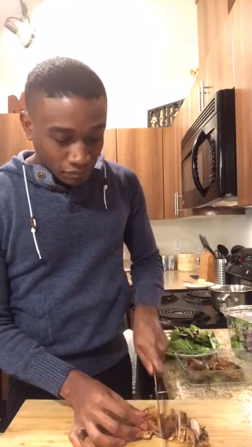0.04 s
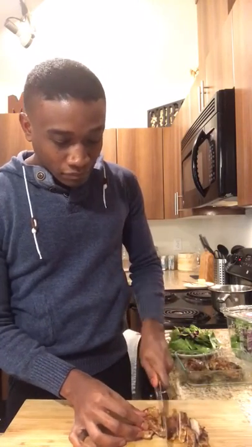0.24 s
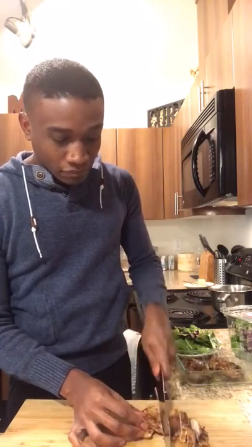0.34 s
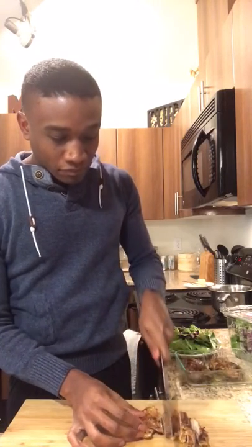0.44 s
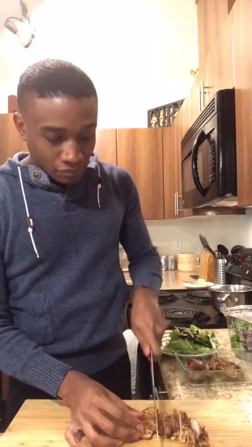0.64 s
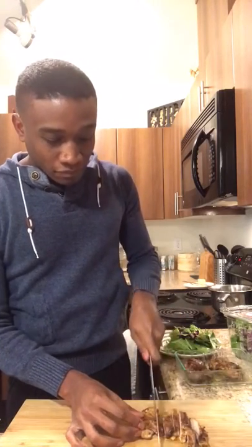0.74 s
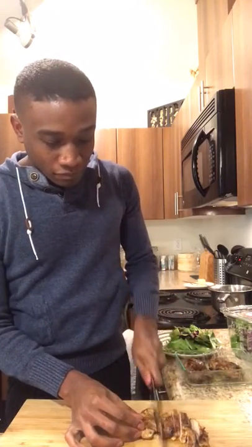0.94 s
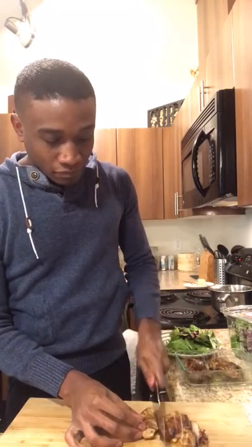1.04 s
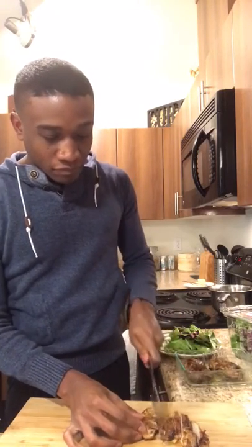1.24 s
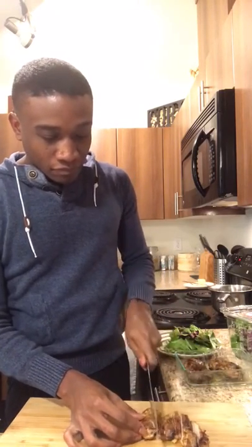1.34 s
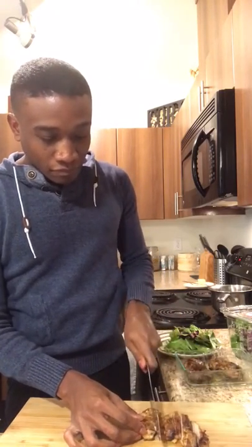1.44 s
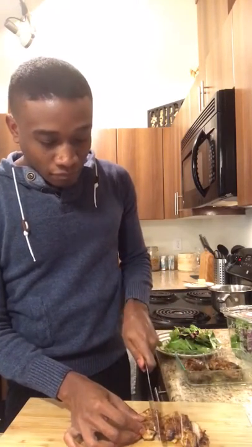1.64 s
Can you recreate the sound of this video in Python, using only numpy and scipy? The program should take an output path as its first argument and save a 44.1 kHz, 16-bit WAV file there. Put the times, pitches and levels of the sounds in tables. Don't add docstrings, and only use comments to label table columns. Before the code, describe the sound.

Knife knocks on a wooden cutting board, two chops with faint wet ticks between, fridge humming

```python
import sys
import numpy as np
from scipy import signal
from scipy.fft import rfft, irfft
from scipy.io import wavfile

SR = 44100
rng = np.random.default_rng(int(sys.argv[2]) if len(sys.argv) > 2 else 0)


def put_to_file(sound):
    columns = np.atleast_2d(sound).T
    safe = np.clip(columns, -1, 1)
    whole_steps = np.round(safe * 32767)
    wavfile.write(sys.argv[1], SR, whole_steps.astype(np.int16))


def gain_from_db(level_db):
    decades = np.asarray(level_db, float) / 20
    return 10 ** decades


N = 74970

# start in seconds, level in dB, contact time in ms, favoured pitch in Hz.
BLOWS = [
    (0.218, -12.5, 0.085, 1810),
    (0.2218, -14.5, 0.15, 700),
    (.2240, -14.5, 0.34, 800),
    (0.2324, -20, 0.46, 1500),
    (0.9805, -20, .12, 3000),
    (0.9813, -17.5, .13, 3100),
    (0.9841, -13.5, 0.4, 650),
    (.9885, -20, 0.45, 2200),
]


def table(points, hz):
    p = np.array(points, float)
    return np.interp(np.log(hz), np.log(p[:, 0]), p[:, 1])


def unit(x):
    return x / np.sqrt(np.mean(x ** 2) + 1e-30)


def ring(x, hz, t60):
    pole = np.exp(2j * np.pi * hz / SR - np.log(1000) / (t60 * SR))
    return signal.lfilter([1], [1, -pole], x).imag


def band(x, hz, width):
    edges = np.clip([hz - width / 2, hz + width / 2], 20, SR * 0.45)
    return signal.sosfilt(signal.butter(2, edges, "band", fs=SR, output="sos"), x)


def high_pass(x, order, hz):
    return signal.sosfilt(signal.butter(order, hz, "high", fs=SR, output="sos"), x)


def push(at, ms):
    progress = np.clip((np.arange(N) / SR - at) * 1000 / ms, 0, 1)
    force = np.sin(np.pi * progress) ** 2
    return force / (force.sum() + 1e-12)


def fridge():
    # pitch in Hz, level in dB per Hz.
    hiss_colour = [(30, -20.5), (60, -2), (90, -15), (200, -18), (400, -19.5), (1000, -28), (4000, -35.5),
                   (16000, -44)]
    # pitch in Hz, rms level in dB, width of its wavering part in Hz.
    hum_tones = [(60, -69, 17), (119, -66.5, 24), (257, -82, 12)]
    t = np.arange(N) / SR
    hz = np.maximum(np.fft.rfftfreq(N, 1 / SR), 1)
    spectrum = rfft(rng.standard_normal(N)) * gain_from_db(table(hiss_colour, hz)) * (hz > 15)
    air = unit(irfft(spectrum, N)) * gain_from_db(-67)
    for pitch, db, width in hum_tones:
        wavering = unit(band(rng.standard_normal(N), pitch, width))
        air = air + gain_from_db(db) * unit(np.sin(2 * np.pi * pitch * t) + 0.5 * wavering)
    return air


def kitchen(x):
    # pitch in Hz, time in seconds.
    room_t60 = [(60, .5), (250, 0.42), (600, 0.34), (1200, 0.33), (2500, 0.35), (5000, 0.24), (12000, 0.16)]
    # pitch in Hz, level in dB.
    room_colour = [(60, -1.5), (250, -1), (600, -7.5), (1200, -2.5), (2500, -7.5), (5000, -4.5),
                   (12000, -7)]
    room_db, build_s = -3, 0.008
    late_db, late_stretch = -14.5, 2.18
    t = np.arange(int(0.9 * SR)) / SR
    tail = 0
    for hz in 60 * 2 ** np.arange(0, 8.1, 0.5):
        t60 = table(room_t60, hz)
        noise = band(rng.standard_normal(len(t)), hz, hz * 0.39)
        fade = gain_from_db(-60 * t / t60) + gain_from_db(late_db - 60 * t / t60 / late_stretch)
        even_energy = np.sqrt(2 * np.log(1000) / t60 / SR)
        tail = tail + gain_from_db(table(room_colour, hz)) * noise * fade * even_energy
    build_up = 1 - np.exp(-t / build_s)
    return signal.fftconvolve(x, tail * build_up)[:N] * gain_from_db(room_db + 6)


def thuds():
    # start in seconds, peak level in dB, pitch in Hz, time to fall by 60 dB in seconds, push in ms.
    thud_list = [(.082, -44.5, 319, 0.036, 2.4), (0.2189, -14, 343, 0.026, 2.5),
                 (.226, -23.5, 146, 0.085, 7.1), (.248, -36, 80.4, .13, 9), (.283, -25.5, 445.3, 0.092, 13),
                 (.32, -44.5, 60, .2, 13), (.981, -16.5, 321, 0.037, 2.3), (0.985, -34, 126.5, 0.13, 7.2),
                 (0.989, -43, 60, .15, 8.7), (1.048, -22, 440, 0.041, 24), (1.115, -45, 267, 0.086, 4.6),
                 (1.128, -33.5, 130.7, 0.12, 2.7), (1.139, -34, 62.7, 0.088, 10),
                 (1.20, -48, 116, 0.095, 3.7), (1.448, -47, 130, .08, 3.15)]
    out, t = np.zeros(N), np.arange(N) / SR
    for at, db, hz, t60, ms in thud_list:
        since = np.maximum(t - at, 0)
        rise = 1 - np.exp(-since * 1000 / ms)
        out += gain_from_db(db) * np.sin(2 * np.pi * hz * since) * rise * gain_from_db(-60 * since / t60)
    return out


def ticks():
    # start in seconds, then peak levels in dB of the low ring, the middle ring and the top snap.
    tick_list = [(0.0014, -58.5, -62.5, -56.5), (0.0274, -75, -64.5, -51.5), (0.031, -67.5, -57, -71.5),
                 (0.046, -81, -58.5, -57.5), (0.0548, -42, -47, -38.5), (0.0632, -47.5, -53, -57),
                 (0.1137, -47.5, -54.5, -56), (0.1384, -58, -57.5, -75), (0.1745, -53.5, -61.5, -64),
                 (0.1894, -70, -68, -61), (0.375, -51, -49, -61), (0.3998, -80, -63, -57),
                 (0.5093, -63, -63, -53.5), (0.5394, -86, -64, -68), (0.7582, -77, -73, -61),
                 (0.7826, -64.5, -61.5, -66), (0.817, -62.5, -57.5, -60.5), (0.9073, -53.5, -74, -75.5),
                 (1.0474, -60, -61, -59), (1.1682, -58, -64.5, -80), (1.1754, -74.5, -58, -56),
                 (1.1897, -42.5, -58.5, -74), (1.2386, -56, -49.5, -64), (1.4466, -69.5, -64.5, -71),
                 (1.487, -62, -59, -69.5)]
    # pitch in Hz, width in Hz, level in dB.
    tick_rings = [
        (3400, 1300, 0),
        (6080, 2000, 1.5),
        (13000, 4500, -1),
    ]
    t60 = 0.005
    out, t = np.zeros(N), np.arange(400) / SR
    for at, *levels in tick_list:
        i = int((at + 0.0005) * SR)
        for db, (hz, width, ring_db) in zip(levels, tick_rings):
            burst = rng.standard_normal(400) * gain_from_db(-60 * t / t60)
            click = band(burst, hz, width)
            out[i:i + 400] += gain_from_db(db + ring_db) * click / np.abs(click).max()
    return out


def rough(hz, width):
    grains = gain_from_db(2.2 * rng.exponential(size=N))
    return unit(band(rng.standard_normal(N) * grains, hz, width))


def slices():
    # number of that blow, length in seconds, level in dB, pitch in Hz, width in Hz.
    squeaks = [
        (0, .006, -47.5, 2600, 500),
        (0, 0.015, -54, 1250, 980),
        (4, 0.0096, -49.5, 3300, 800),
        (4, 0.027, -61, 1700, 5400),
    ]
    # middle in seconds, length in seconds, level in dB, pitch in Hz, width in Hz.
    rustles = [(0.068, .024, -71, 13100, 4100), (.072, .036, -63.5, 3900, 4800),
               (0.115, 0.15, -76, 5400, 4100), (0.1477, .015, -64, 4400, 5100),
               (0.363, .12, -72, 5000, 3500), (.372, 0.083, -77.5, 13400, 5100),
               (.522, .042, -80.5, 13100, 5100), (0.8128, 0.0071, -73, 13400, 4100),
               (0.923, 0.1, -70.5, 4100, 1600), (.928, 0.13, -64.5, 275, 210),
               (0.9624, 0.0056, -70, 6100, 6100), (1.028, .105, -74, 14100, 3900),
               (1.25, 0.27, -67, 290, 180), (0.249, 0.093, -78.5, 13000, 5000)]
    t = np.arange(N) / SR
    out = 0
    for blow, length, db, hz, width in squeaks:
        end = BLOWS[round(blow)][0]
        growth = np.clip(1 + (t - end) / length, 0, 1) ** 0.5 * (t < end)
        out = out + gain_from_db(db) * rough(hz, width) * growth
    for mid, length, db, hz, width in rustles:
        swell = np.cos(np.pi * np.clip((t - mid) / length, -0.5, 0.5))
        out = out + gain_from_db(db) * rough(hz, width) * swell
    return out


def spread():
    # pitch in Hz, level in dB.
    far_colour = [(100, -13), (450, -7.5), (800, -0.5), (1200, -2.5), (1900, -7.5), (2800, -17.5),
                  (4400, -26), (16000, -59)]
    # pitch in Hz, level in dB.
    near_colour = [(100, -13.5), (450, -6.5), (1050, -2), (1500, -17), (1900, -8), (2400, -15.5),
                   (3500, -20.5), (16000, -49.5)]
    burst_db = (3, -4)
    out, hz = np.zeros(N), np.maximum(np.fft.rfftfreq(512, 1 / SR), 1)
    starts = (BLOWS[0][0], BLOWS[5][0])
    for at, colour, db in zip(starts, (far_colour, near_colour), burst_db):
        burst = np.roll(irfft(gain_from_db(table(colour, hz))), 256) * np.hanning(512)
        i = int(at * SR) - 200
        out[i:i + 512] += gain_from_db(db) * burst / np.sqrt(np.sum(burst ** 2))
    return out


def knife():
    # pitch in Hz, level in dB, time to fall by 60 dB in seconds.
    far_end = [(368, -12.5, 0.026), (567, -21, .04), (829.3, -4, 0.023), (1052, -3.5, .03),
               (1240, -7, 0.051), (1378, -7, 0.016), (1674, -1, .021), (1796, -7.5, .022),
               (2419, -6, 0.014), (2900, -5.5, .011), (3350, -3.5, 0.01), (4550, -2, .012),
               (6760, -1.5, 0.019)]
    # pitch in Hz, level in dB, time to fall by 60 dB in seconds.
    near_end = [(370, -16.5, .05), (547, -22.5, 0.035), (808, 0, 0.023), (1003, -0.5, 0.032),
                (1316, -4.5, .02), (1866, -7.5, 0.042), (2550, -5.5, 0.015), (2815, -10, .01),
                (3570, -6, 0.013), (4200, -9.5, 0.012), (5700, -13.5, 0.0079), (6900, -13.5, 0.0076)]
    second_chop_s = 0.6
    favour_db = -5.5
    crack_db, crack_s, crack_hz = -43, 0.0015, 6010
    out, t = np.zeros(N), np.arange(N) / SR
    chance = rng.standard_normal((len(BLOWS), 16))
    hiss = band(rng.standard_normal(N), crack_hz, 6300)
    for (at, db, ms, best), luck in zip(BLOWS, chance):
        force = push(at, ms)
        modes = near_end if at > second_chop_s else far_end
        for k, (hz, mode_db, t60) in enumerate(modes):
            favour = favour_db * np.log2(hz / best) ** 2
            sign = (-1) ** (k // 2)
            out += gain_from_db(db + mode_db + favour + 3.7 * luck[k]) * sign * ring(force, hz, t60)
        fade = (t > at) * np.exp(-np.abs(t - at) / crack_s)
        out += gain_from_db(db + crack_db + 18) * (best / 2500) ** 2 * hiss * fade
    return high_pass(out, 2, 169.8)


def scene():
    knocks = knife()
    food = slices() + ticks()
    echoes = kitchen(spread() + 0.1 * knocks + 0.26 * food)
    return (knocks + food + thuds() + echoes + fridge())[None]


def low_pass(x):
    return signal.sosfilt(signal.butter(12, 16500, fs=SR, output="sos"), x)


def record(dry):
    mix = high_pass(dry, 3, 48.4)
    return low_pass(mix)


dry = scene()
out = record(dry)
put_to_file(out)
```